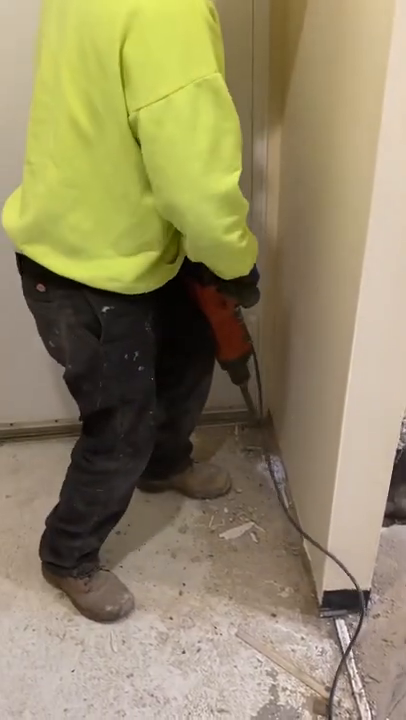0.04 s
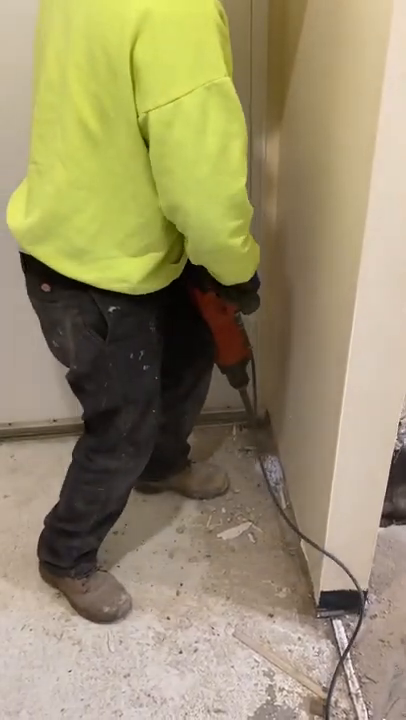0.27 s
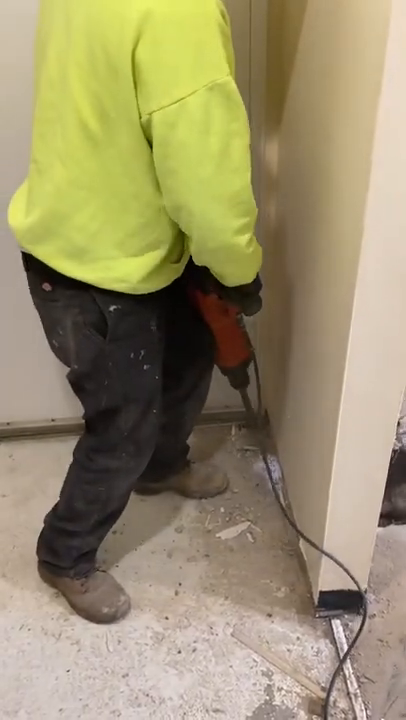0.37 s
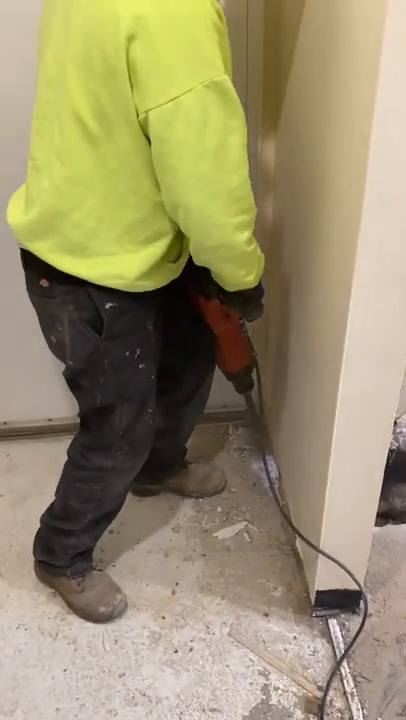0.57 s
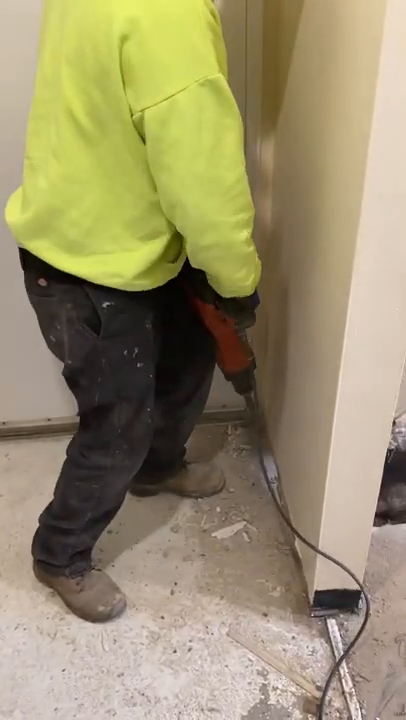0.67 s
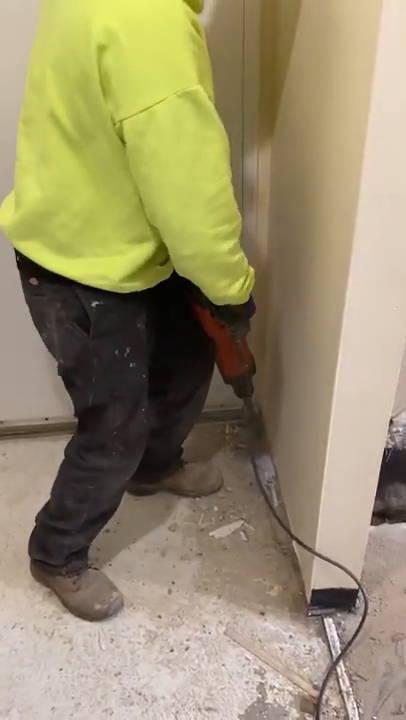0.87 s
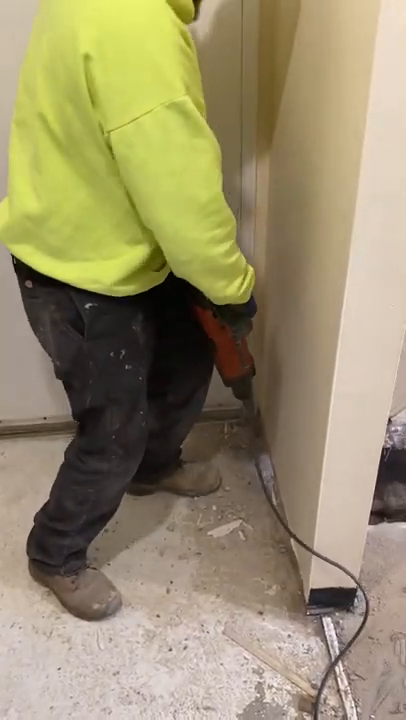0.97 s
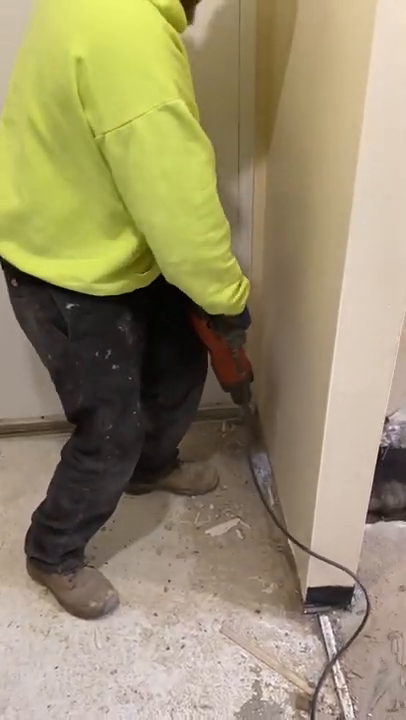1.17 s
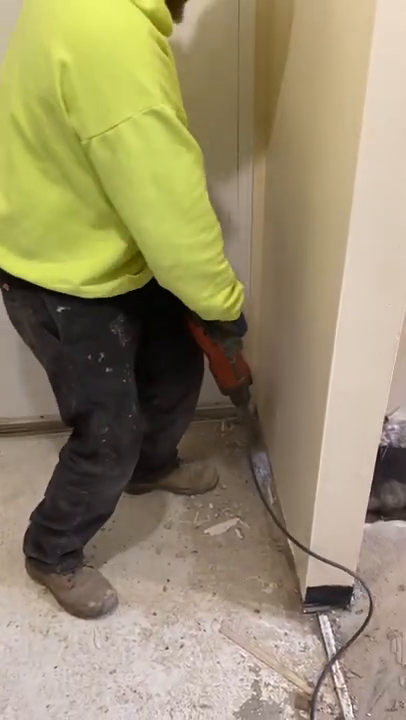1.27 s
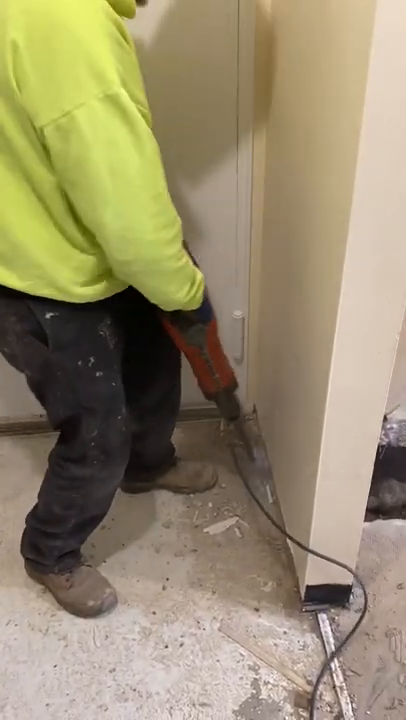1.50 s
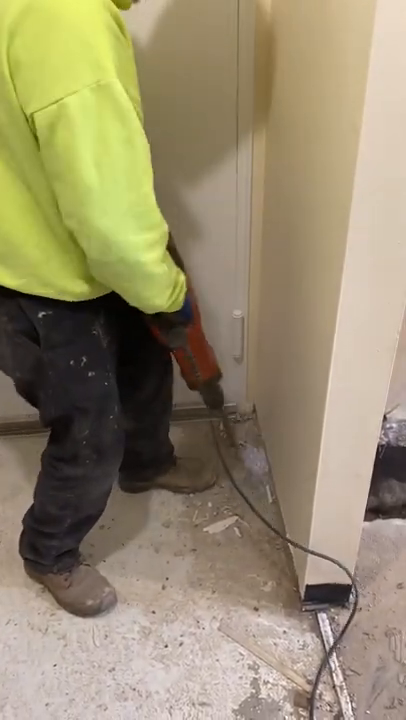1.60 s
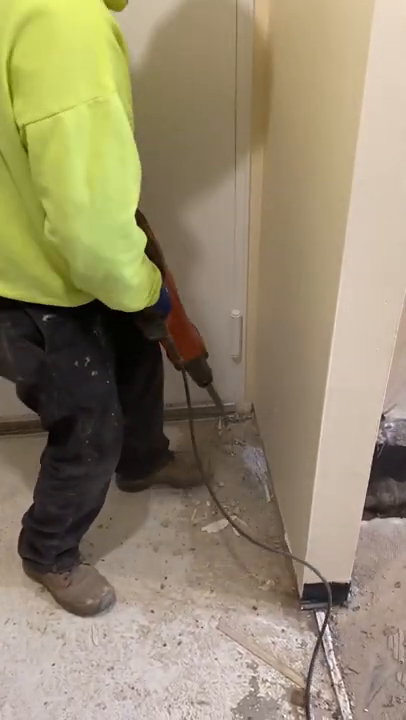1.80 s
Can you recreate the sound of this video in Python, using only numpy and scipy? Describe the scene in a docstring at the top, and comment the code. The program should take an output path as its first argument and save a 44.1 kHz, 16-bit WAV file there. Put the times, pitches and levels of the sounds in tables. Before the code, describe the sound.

A demolition hammer chisels a concrete floor in a small bare room, its rapid blows ringing the steel and crunching grit over a whining motor. After a hard clack, the motor races briefly and starts to slow.

```python
"""In a small bare room, a corded demolition hammer chisels a concrete floor, about 30 blows a second.
Each blow knocks the housing, rings the steel chisel, crushes grit and booms in the floor.
The whining motor sags under load. The chisel comes free with a hard clack,
then the motor races briefly and starts to run down."""
import sys
import numpy as np
from scipy import signal
from scipy.fft import rfft, irfft, next_fast_len
from scipy.io import wavfile

SR = 44100
rng = np.random.default_rng(int(sys.argv[2]) if len(sys.argv) > 2 else 0)


def wav_out(sig):
    """Save sig, one row per channel (or a flat mono array), as 16-bit PCM at SR to the path in sys.argv[1]."""
    wavfile.write(sys.argv[1], SR, np.round(np.clip(np.atleast_2d(sig).T, -1, 1) * 32767).astype(np.int16))


N = 81585

# One row per hammer blow; each sound adds its own offset to these levels: (time [s], knock [dB],
# knock pitch [Hz], grit [dB], chisel ring [dB], jammed chisel ring [dB], floor boom [dB])
BLOWS = [(0.207, -35, 1400, -41, -31.5, -51, -42.5), (0.2391, -42, 1400, -37.5, -24.5, -56, -39),
         (0.2722, -29, 1430, -37.5, -27, -36, -34.5), (0.3064, -28.5, 1360, -35.5, -26.5, -36, -31.5),
         (0.3379, -28.5, 1430, -29.5, -18.5, -42, -36.5), (0.3739, -26, 1370, -26, -18.5, -22, -32.5),
         (0.4091, -25, 1390, -38, -18.5, -25.5, -29), (0.4454, -25, 1390, -30.5, -22, -35, -30),
         (0.4821, -26, 1350, -27.5, -15.5, -23.5, -32.5), (0.5187, -23, 1480, -28.5, -14.5, -46, -30),
         (0.5547, -22.5, 1483, -28, -20, -28, -29), (0.59, -27, 1430, -28.5, -23.5, -29, -29),
         (0.6236, -24, 1450, -28, -21.5, -29.5, -36), (0.6584, -23, 1494, -28, -22, -18, -29),
         (0.6927, -24.5, 1460, -29, -17.5, -23.5, -28), (0.7271, -21.5, 1556, -27, -18, -31, -29),
         (0.7606, -20.5, 1440, -26.5, -16.5, -45, -28.5), (0.795, -25, 1480, -24, -19.5, -26, -25.5),
         (0.8287, -27, 1390, -28.5, -27, -45, -25), (0.862, -22, 1448, -27.5, -19.5, -57, -24),
         (0.895, -29, 1370, -27.5, -24, -48, -29.5), (0.9285, -28, 1360, -33.5, -22.5, -47, -24.5),
         (0.9616, -28, 1523, -28.5, -20, -40, -27.5), (0.9945, -23.5, 1430, -32, -18, -43, -24.5),
         (1.0275, -31, 1415, -28.5, -19, -49, -24.5), (1.0604, -23.5, 1430, -31, -16.5, -37, -28.5),
         (1.0936, -26.5, 1340, -30, -18.5, -46, -25), (1.1258, -25, 1450, -28, -18.5, -42, -34.5),
         (1.1587, -24.5, 1250, -27.5, -17, -48, -26), (1.1917, -22.5, 1304, -31, -20, -46, -28),
         (1.2245, -26, 1180, -27, -14.5, -49, -31), (1.2565, -30, 1370, -30, -21, -48, -28),
         (1.2898, -23.5, 1340, -28.5, -18.5, -54, -32), (1.3229, -26.5, 1220, -26, -21.5, -52, -25),
         (1.3563, -44, 1480, -32, -29, -52, -27.5), (1.3894, -9.5, 1326, -19, -25, -48, -25),
         (1.4258, -17.5, 1313, -22, -32, -66, -36), (1.4557, -51, 1370, -30, -41, -60, -37)]


def amp(db):
    """Turns decibels into a gain."""
    return 10 ** (np.asarray(db) / 20)


def unit(x):
    """Scales a signal to an average size (rms) of 1."""
    return x / np.sqrt(np.mean(x ** 2) + 1e-20)


def read(points, hz):
    """Looks up a table between its rows, on a log frequency scale."""
    f, value = np.transpose(points)
    return np.interp(np.log(hz + 1), np.log(f + 1), value)


def add(mix, s, sound):
    """Mixes a sound in at s seconds."""
    part = mix[max(round(s * SR), 0):][:len(sound)]
    part += sound[:len(part)]


def colour(x, points, size=4096):
    """Gives noise the tone colour in a table, keeping its power and adding no sound ahead of it."""
    log_gain = np.log(amp(read(points, abs(np.fft.fftfreq(size, 1 / SR)))))
    response = np.exp(signal.hilbert(log_gain).conj())
    taps = np.fft.ifft(response).real[:size // 2]
    return signal.fftconvolve(x, taps / np.linalg.norm(taps))[:N]


def wander(rate_hz):
    """A smooth random wobble of average size 1."""
    at = np.arange(N) * 2 * min(rate_hz, SR / 20) / SR
    points = rng.standard_normal(N // 10 + 2)
    return unit(np.interp(at, np.arange(len(points)), points))


def ring(times, levels, modes, rise_s, detune, scatter_db, pitch=1):
    """Each hit rings an object's own tones a little differently; they drop 60 dB in their fade time."""
    hz, db, fade_s = np.transpose(modes)[:, :, None]
    t, out = np.arange(0, .8 * fade_s.max(), 1 / SR), np.zeros(N)
    envelope = amp(db - 60 * t / fade_s) * (1 - np.exp(-(t / rise_s) ** 2))
    chance = rng.standard_normal((len(times), 2, len(modes), 1))
    for s, level, stretch, (mistune, louder) in zip(times, levels, pitch * np.ones(len(times)), chance):
        waves = np.sin((2 * np.pi * hz * stretch * (1 + detune * mistune) * t).astype("float32"))
        add(out, s, amp(level + scatter_db * louder[:, 0]) @ (envelope * waves))
    return out


def burst(times, levels, spectrum, peak_s, tail_db, tail_s, grain_db):
    """Each hit throws a sharp spurt of grainy noise, then a dying trickle."""
    t, power = np.arange(SR // 6) / SR, np.zeros(N)
    spurt = t / peak_s * np.exp(1 - t / peak_s)
    trickle = amp(tail_db) * np.exp(-t / tail_s) * (1 - np.exp(-t / peak_s))
    for s, level in zip(times, levels):
        add(power, s, (amp(level) * (spurt + trickle)) ** 2)
    grains = unit(rng.standard_normal(N) * amp(grain_db * wander(1220)))
    return colour(grains * np.sqrt(power), spectrum)


def spread(pair, width, corner_hz=400):
    """Sound from all around: left and right are alike in the bass and partly unrelated above."""
    side = width * signal.lfilter(*signal.butter(1, corner_hz, "high", fs=SR), pair[1])
    return np.array([pair[0] + side, pair[0] - side]) / np.sqrt(1 + width ** 2)


def room(x, level_db=-5, echoes_per_s=4000, size=256):
    """Bare walls throw back many small echoes that blur into a short tail."""
    # How long the room rings: (frequency [Hz], fade time [s])
    fade_times = [(100, 0.23), (500, 0.34), (2000, 0.23), (6000, 0.14), (14000, 0.13)]
    t = np.arange(SR // 2) / SR
    taps = rng.choice([-1., 1.], (2, len(t)))
    taps *= (rng.random(taps.shape) < echoes_per_s / SR) * (t > .003)
    hz, at, spectrum = signal.stft(taps, SR, nperseg=size)
    fade = amp(-60 * at / read(fade_times, hz)[:, None])
    tail = signal.istft(spectrum * fade, SR, nperseg=size)[1][:, :len(t)]
    echo = amp(level_db) * tail / np.linalg.norm(tail[0])
    return spread(signal.fftconvolve(x[None], echo, axes=1)[:, :N], width=0.17)


def motor(blades=9, waver=0.00396, flutter_db=3.5):
    """The motor whines at multiples of its turning speed while its fan rushes air."""
    # The motor sags, races and slows: (time [s], fan blade pitch [Hz], whine [dB], air [dB])
    course = [(0, 2869, -44.5, -43.5), (0.191, 2758, -45, -44), (0.329, 2580, -50, -38.5),
              (0.46, 2381, -43.5, -37), (0.701, 2543, -42.5, -36), (0.948, 2678, -42.5, -36),
              (1.362, 2658, -43, -35.5), (1.45, 3110, -39, -41), (1.5, 3205, -44, -39),
              (1.6, 3178, -46.5, -40), (1.7, 3054, -44.5, -42), (1.85, 2890, -44, -41.5)]
    # Tones of the whine: (multiple of the shaft speed [x], level [dB])
    tones = [(3, -7), (5, -9), (6, -10), (8, -7), (9, -4), (12, -14), (16, -15), (17, -15), (18, -2.5),
             (24, -19), (27, -13), (36, -19)]
    # How the casing colours the whine: (frequency [Hz], level [dB])
    casing = [(900, -5), (2500, 2), (2800, -3), (3050, 2), (4500, 2.5), (5800, 1.5), (6300, -0.5),
              (8700, 2.5), (9500, 6.5), (11000, 0), (13000, -5)]
    # Colour of the rushing air: (frequency [Hz], level [dB])
    air_colour = [(20, -34), (70, -7), (130, -0.5), (240, 7.5), (400, -3), (700, 0), (1100, 4), (1700, 0.5),
                  (2300, -1), (3000, -3), (3700, -4.5), (5800, -5), (7200, -29), (9000, -12.5),
                  (12000, -18.5), (13500, -26), (16000, -59)]
    s, *controls = np.transpose(course)
    blade_hz, whine_db, air_db = (np.interp(np.arange(N) / SR, s, c) for c in controls)
    shaft_hz = blade_hz / blades
    angle = 2 * np.pi * np.cumsum(shaft_hz * (1 + waver * wander(95))) / SR
    whine = np.zeros(N)
    for multiple, db in tones:
        gain = amp(db + read(casing, multiple * shaft_hz) + flutter_db * wander(60))
        whine += gain * np.cos(multiple * angle + 2 * np.pi * rng.random())
    air = spread([colour(noise, air_colour) for noise in rng.standard_normal((2, N))], width=0.35)
    return amp(whine_db - 1.5) * whine + amp(air_db + 0.49 * wander(70)) * air


def floor(return_s=0.01522):
    """The slab booms and rumbles at each blow, and booms again as the piston knocks on its way back."""
    # Deep tones of the slab: (pitch [Hz], level [dB], fade time [s])
    slab = [(63.4, -22, 0.16), (121.6, -10, 0.192), (184.3, -5, 0.23), (243, 0.5, 0.14), (298, -27, 0.019),
            (334.8, -8.5, 0.16), (396.8, -9, 0.11), (635.3, -14, 0.15), (842, -19, 0.081),
            (975, -18, 0.082)]
    # Colour of the loose rumble: (frequency [Hz], level [dB])
    rumble_colour = [(20, -27), (45, -28), (95, -1), (150, -4), (260, 4.5), (450, -0.5), (800, -2.5),
                     (1500, -36.5), (4000, -13.5), (16000, -63)]
    s, *_, boom_db = np.transpose(BLOWS)
    stroke = ring(s, boom_db - 1.5, slab, rise_s=0.0042, detune=0.0013, scatter_db=-0.8)
    back = ring(s + return_s, boom_db - 2, slab, rise_s=0.0022, detune=0.0033, scatter_db=-0.24)
    rumble = burst(s, boom_db - 10, rumble_colour, peak_s=0.0072, tail_db=-7, tail_s=0.036, grain_db=4)
    return stroke + back + rumble


def chips(s, grit_db, flight_s=.025):
    """After each blow a few chips snap off and tick, each at its own moment and pitch."""
    # One tick per concrete chip: (pitch [Hz], level [dB], fade time [s])
    ticks = [(3300, -6, 0.006), (4560, -1, .004), (5900, 1, .003), (8400, -2, 0.0024), (9640, 6, 0.0048),
             (10900, -11, 0.0021)]
    out = np.zeros(N)
    for tick in ticks:
        times = s + flight_s * rng.random(len(s))
        levels = grit_db - 4 + 5 * rng.standard_normal(len(s))
        out += ring(times, levels, [tick], rise_s=.0001, detune=0.12, scatter_db=2)
    return out


def concrete(s, grit_db, steel_db, lead_s=0.0039, wall_s=.0052):
    """The striker scuffs forward just before each blow, then the concrete crunches and cracks."""
    # Colour of crushed grit: (frequency [Hz], level [dB])
    grit_colour = [(30, -17), (120, -2), (300, 4), (560, 0), (950, -2.5), (1400, -9), (1900, -4.5),
                   (2750, 3.5), (3500, -5.5), (5000, -6.5), (6200, -0.5), (8000, -0.5), (10000, -6.5),
                   (11800, -10.5), (13500, -1.5), (16000, -32)]
    # Colour of the sharp crack: (frequency [Hz], level [dB])
    crack_colour = [(100, -13), (2000, -20.5), (4800, -15.5), (6200, 1), (7200, -4), (8200, -7),
                    (9500, -37), (11500, -39), (13700, -7.5), (15000, -42), (16500, -36)]
    crunch = burst(s, grit_db + 3.95, grit_colour, peak_s=0.00095, tail_db=-6, tail_s=0.021, grain_db=3)
    crack = burst(s, steel_db + 0.69, crack_colour,
                  peak_s=0.00069, tail_db=-14, tail_s=0.0063, grain_db=3)
    scuff = burst(s[1:] - lead_s, grit_db[1:] - 12.5, grit_colour,
                  peak_s=0.0013, tail_db=-22, tail_s=.003, grain_db=3.5)
    breaking = crunch + crack
    add(breaking, wall_s, amp(-12) * breaking)  # first echo, off the wall beside the tool
    return breaking + scuff


def chisel(s, steel_db, jam_db, chatter_db=3):
    """The struck steel chatters as it rings. Returns the singing of shank and jam, and the bright ring."""
    # Tones of the chisel: (pitch [Hz], level [dB], fade time [s])
    steel_tones = [(2620, -17, .06), (6165, -9, .05), (6480, -11, .03), (7400, -8, .012), (7715, -12, .035),
                   (8980, -16, .08), (11350, -24, .05), (13500, -17, .045), (13830, -11, .045),
                   (15650, -33, .06)]
    # Tones of its shank, or shaft: (pitch [Hz], level [dB], fade time [s])
    shank_tones = [(7170, -5, .19), (7230, 0, .014), (7320, -12, .06)]
    # Tones of the chisel when it jams: (pitch [Hz], level [dB], fade time [s])
    jam_tones = [(3850, -17, .05), (5305, -2.5, .22), (5352, -9, .13), (5453, -13, .08), (6099, -9, .11),
                 (6158, -11, .1), (7720, -5, .06), (10510, -12, .11), (13490, -8, .06)]
    # The shank sings louder when the chisel is seated in its cut: (time [s], level [dB])
    seated = [(.2, 6.5), (.45, 2), (.78, -3.5), (.87, 10), (1.15, -0.5), (1.33, 3), (1.39, -6)]
    shank_db = steel_db + np.interp(s, *np.transpose(seated))
    steel = ring(s, steel_db + .5, steel_tones, rise_s=.0011, detune=0.0047, scatter_db=3)
    shank = ring(s, shank_db, shank_tones, rise_s=.0007, detune=0.00184, scatter_db=1.7)
    jammed = ring(s, jam_db - 1.5, jam_tones, rise_s=.0011, detune=0.0016, scatter_db=-2)
    chatter = amp(chatter_db * wander(170))
    return (shank + jammed) * chatter, steel * chatter


def knock(s, knock_db, knock_hz, grit_db):
    """Each blow knocks the tool's housing, and the tip lands on the slab with a dead thud."""
    # Tones of the housing for a 1400 Hz knock: (pitch [Hz], level [dB], fade time [s])
    housing_tones = [(630, -10, 0.016), (1210, -4, 0.0061), (1418, 12.5, 0.0095), (1764, -2, 0.019),
                     (2670, -24, 0.0072)]
    # Tones of the thud: (pitch [Hz], level [dB], fade time [s])
    thud_tones = [(480, -2, 0.0064), (718, 1.5, 0.0076), (950, -4.5, 0.0026)]
    housing = ring(s, knock_db - .3, housing_tones,
                   rise_s=0.00073, detune=0.024, scatter_db=0.46, pitch=knock_hz / 1400)
    thud = ring(s - .0004, grit_db + 2.5, thud_tones, rise_s=0.00031, detune=0.11, scatter_db=2)
    return housing + thud


def scene(shift_hz=3.704):
    """The hammer in its room; the echoes shift as the tool moves."""
    s, knock_db, knock_hz, grit_db, steel_db, jam_db, _ = np.transpose(BLOWS)
    knocks = knock(s, knock_db, knock_hz, grit_db)
    singing, steel = chisel(s, steel_db, jam_db)
    near = knocks + singing
    bright = steel + concrete(s, grit_db, steel_db) + chips(s, grit_db)
    to_walls = bright + amp(-8) * near  # the near sounds arrive mostly direct
    sway = 2 * np.pi * shift_hz * np.arange(N) / SR
    echoes = room(to_walls * np.cos(sway)) + room(to_walls * np.sin(sway))
    return near + bright + echoes + floor() + motor()


def record(dry, ceiling=0.64, top_hz=16200):
    """Two microphones hear the scene; peaks are rounded off and the highest treble is cut."""
    # How much louder the left microphone is than the right: (frequency [Hz], level [dB])
    balance = [(20, 0.5), (300, -1.5), (700, 4), (1400, 2), (2400, 0), (16000, -1)]
    # How far the left microphone leads the right: (frequency [Hz], phase [radians])
    phase_lead = [(20, 0), (1800, 0), (2600, 1.3), (3800, 1), (5300, .9), (6200, 1.9), (7200, 3.1),
                  (8300, 3.8), (9000, 4.7), (9900, 6.1), (11300, 6.4), (12100, 7.9), (13000, 9.3),
                  (14500, 9.6), (15600, 11.7)]
    size = next_fast_len(N + 2048)
    hz = np.fft.rfftfreq(size, 1 / SR)
    left = amp(read(balance, hz) / 2) * np.exp(.5j * read(phase_lead, hz))
    heard = irfft(rfft(dry, size) * np.array([left, 1 / left]), size)[:, :N]
    rounded = ceiling * np.tanh(heard / ceiling)
    treble_cut = signal.firwin(255, top_hz, window=("kaiser", 9), fs=SR)
    return signal.oaconvolve(rounded, treble_cut[None], "same")


dry = scene()
out = record(dry)
wav_out(out)
```